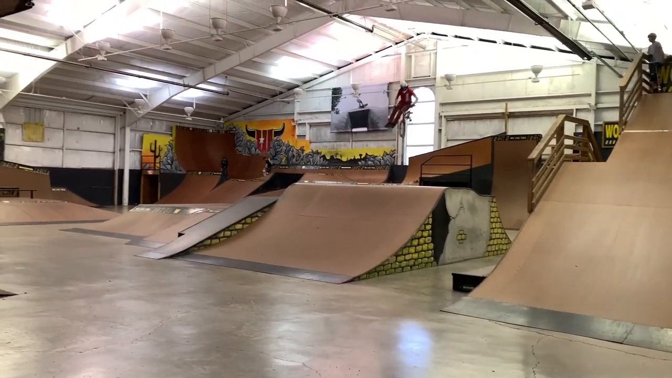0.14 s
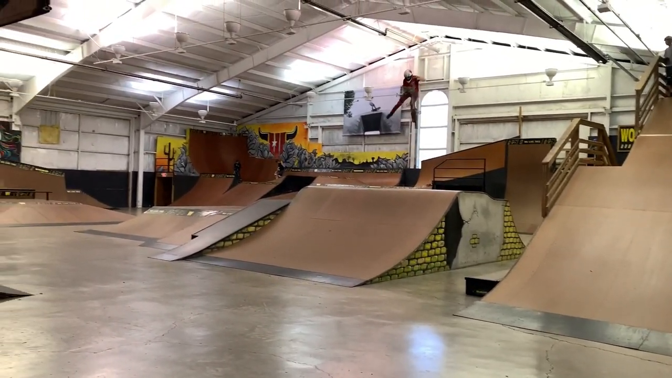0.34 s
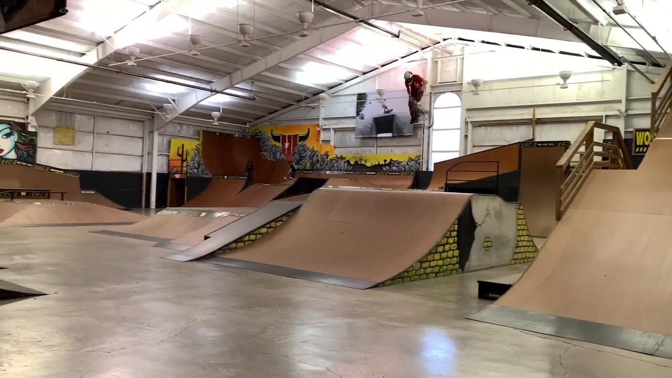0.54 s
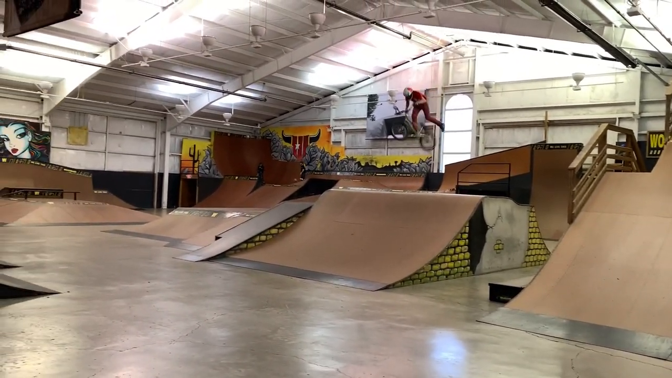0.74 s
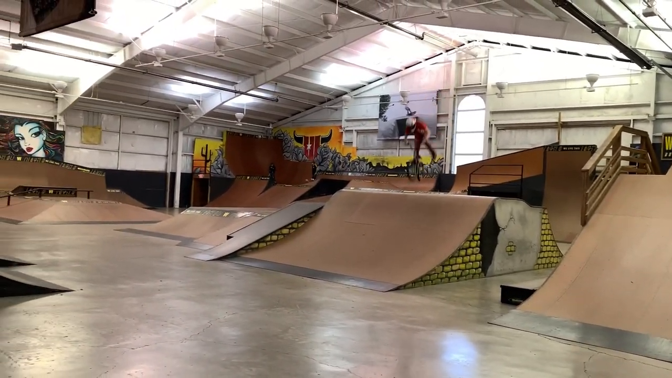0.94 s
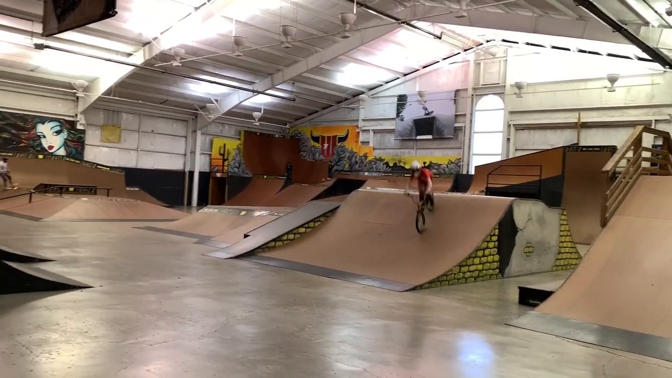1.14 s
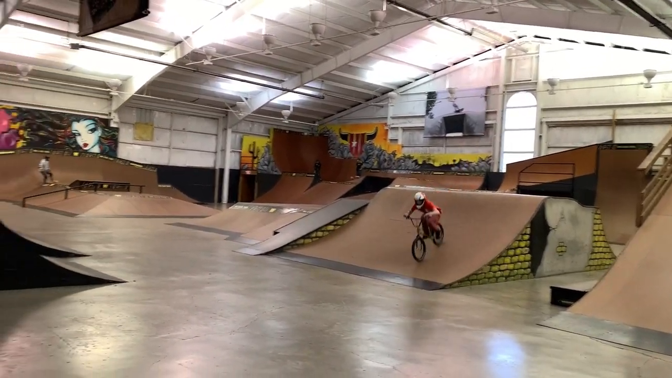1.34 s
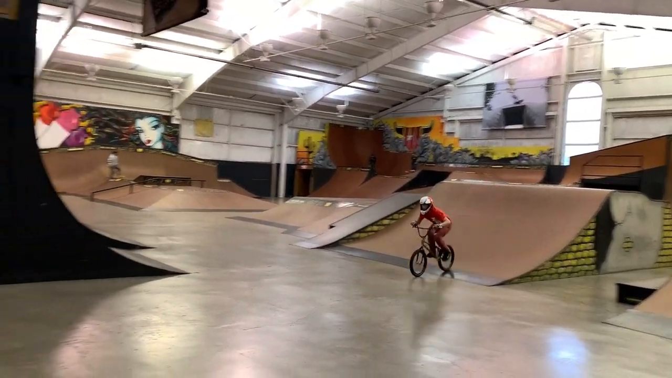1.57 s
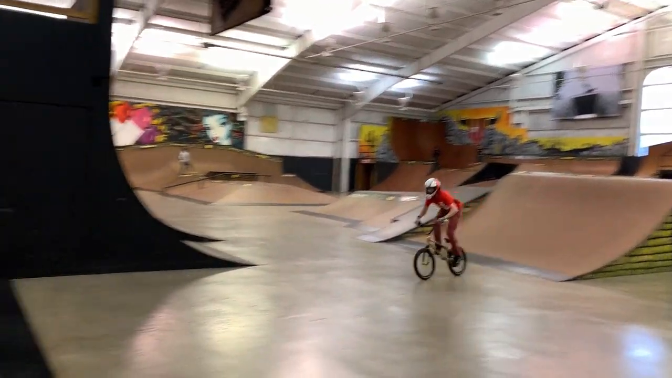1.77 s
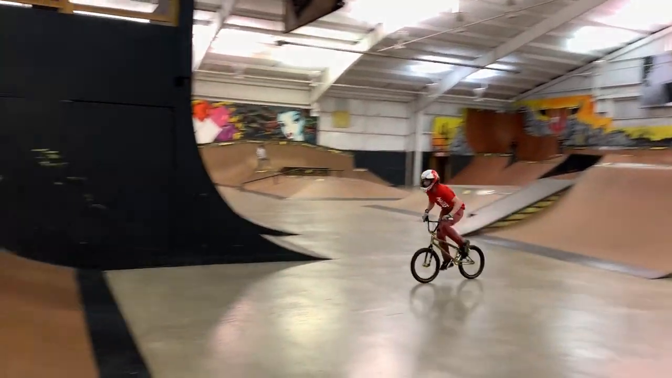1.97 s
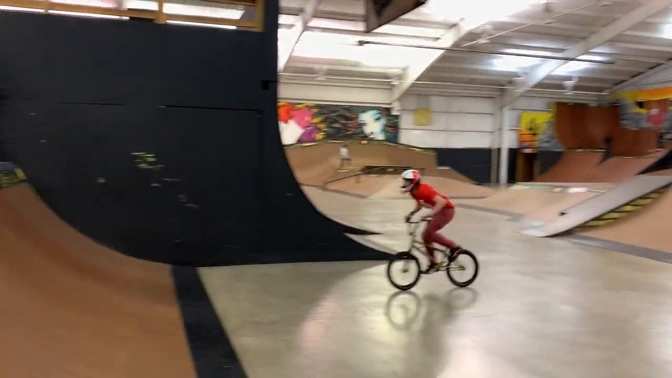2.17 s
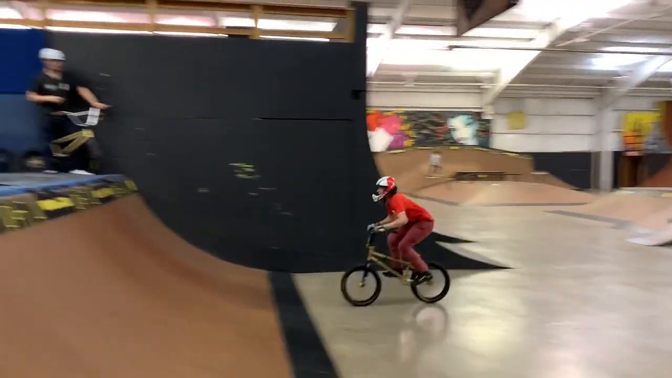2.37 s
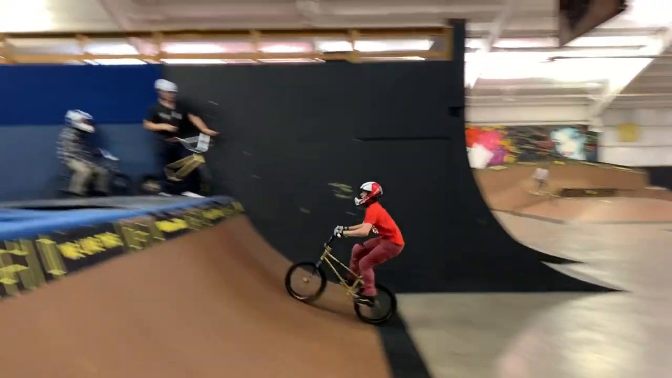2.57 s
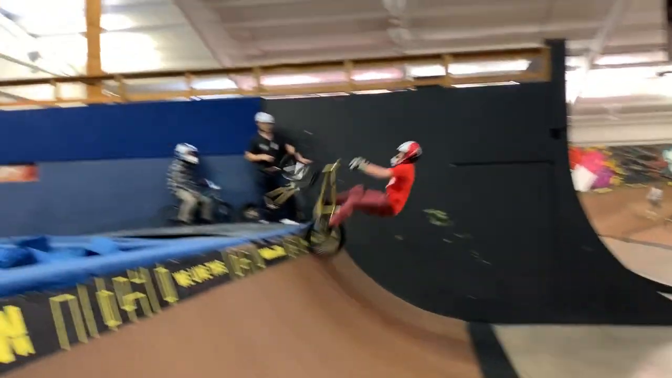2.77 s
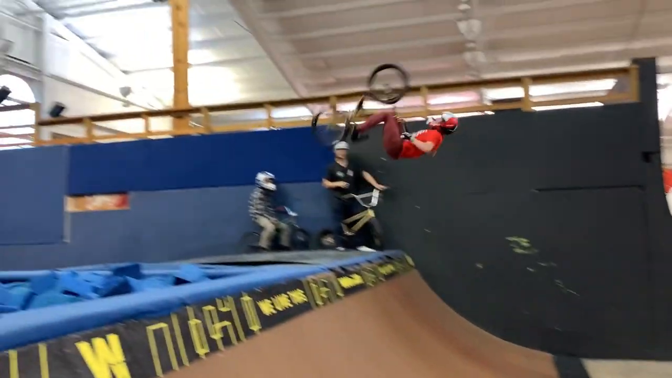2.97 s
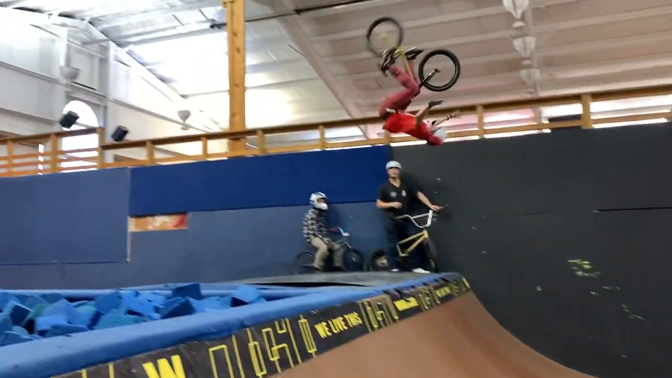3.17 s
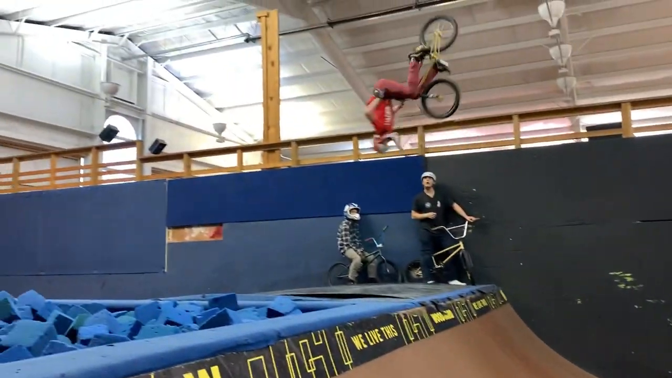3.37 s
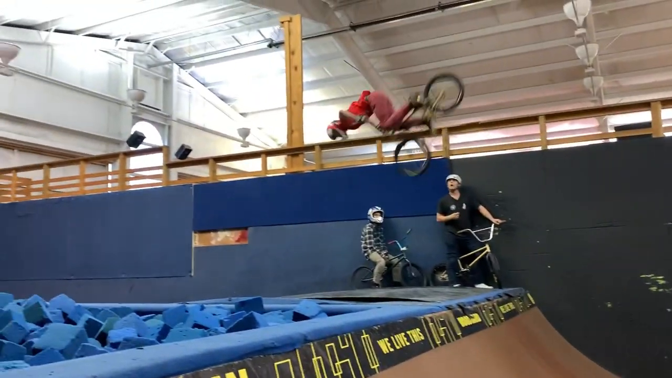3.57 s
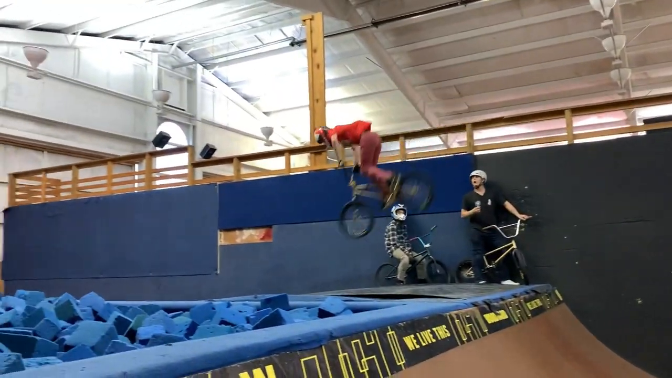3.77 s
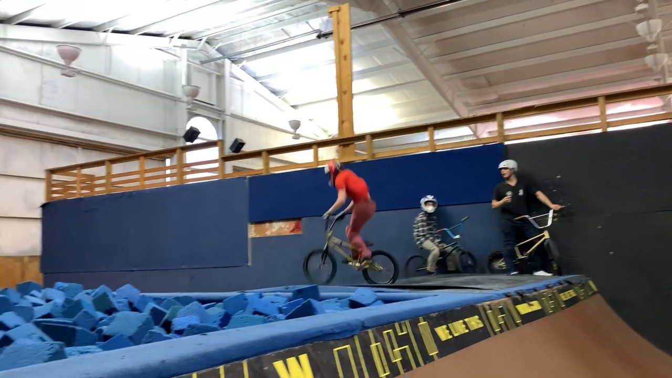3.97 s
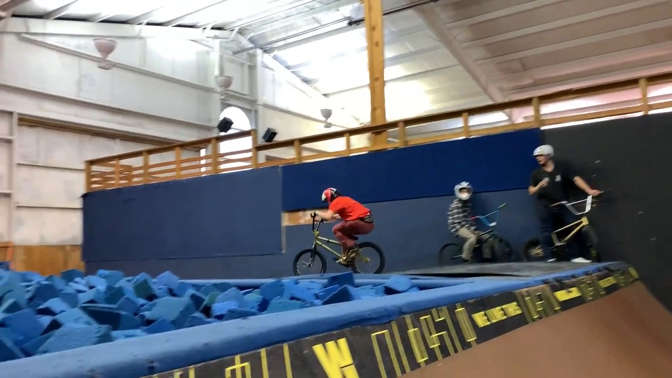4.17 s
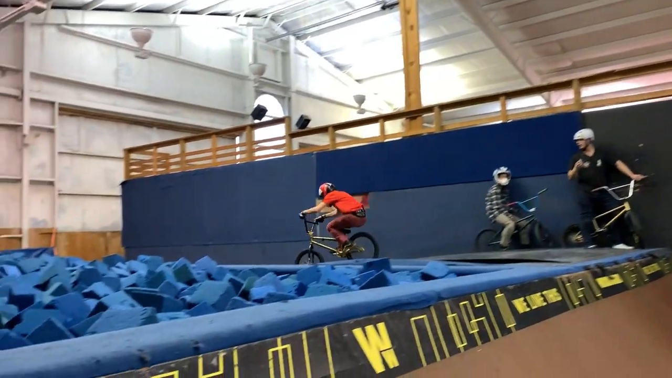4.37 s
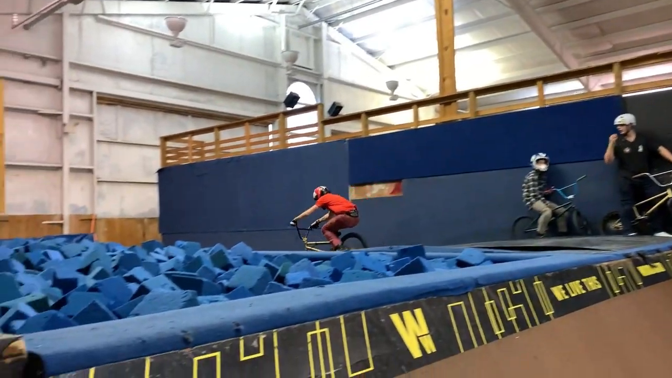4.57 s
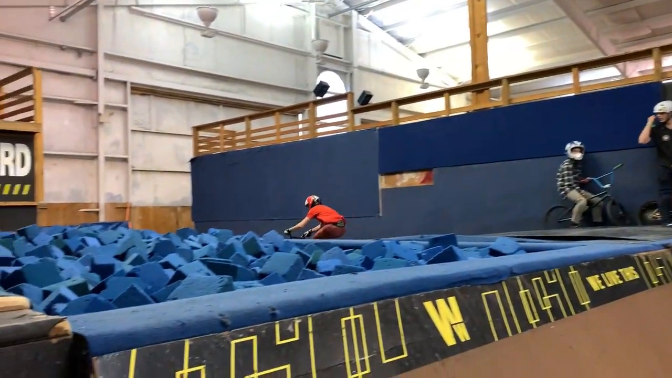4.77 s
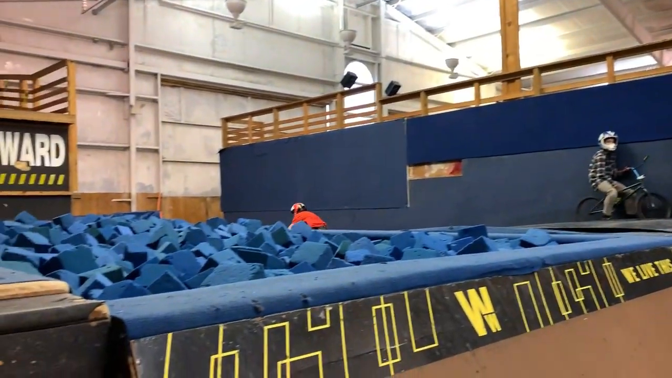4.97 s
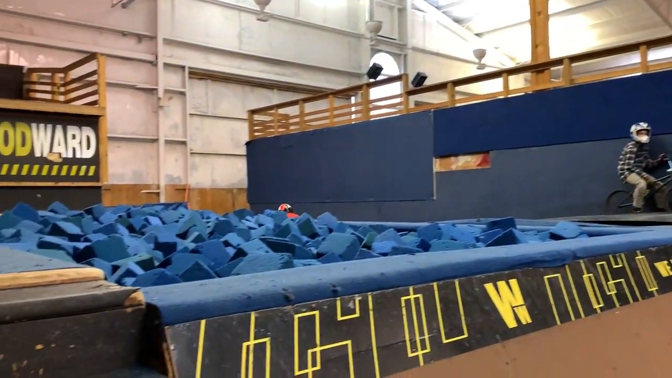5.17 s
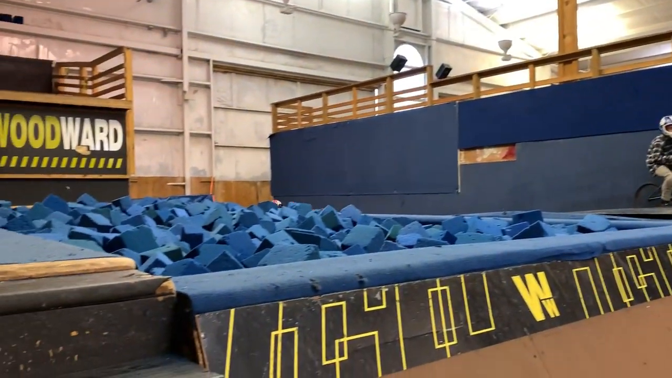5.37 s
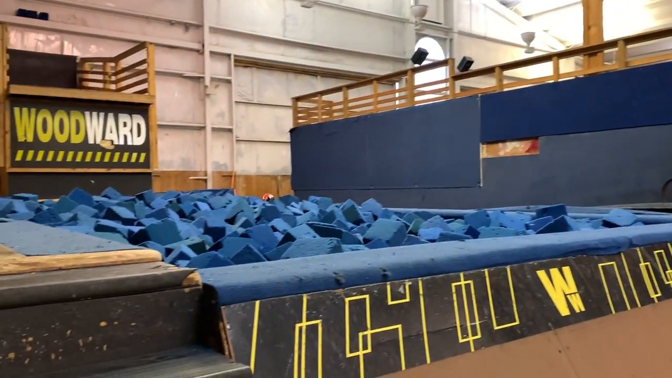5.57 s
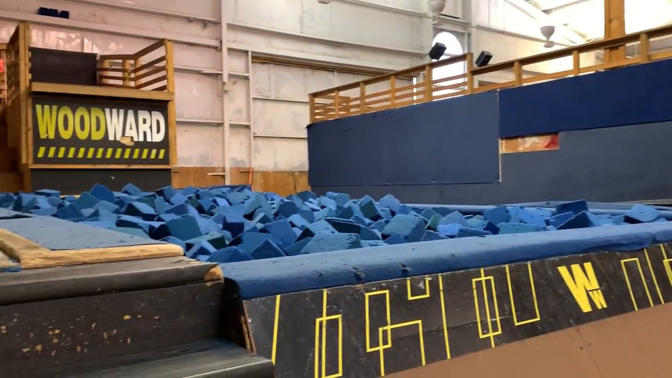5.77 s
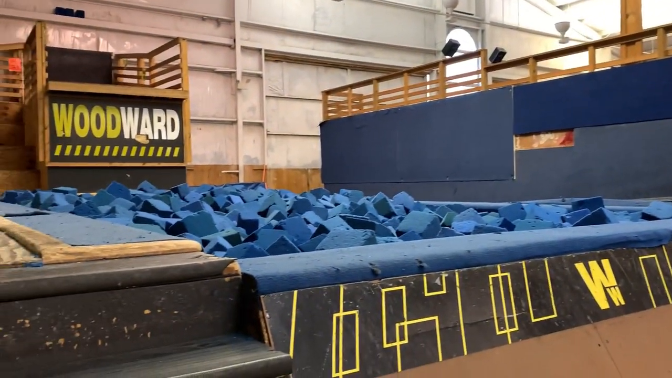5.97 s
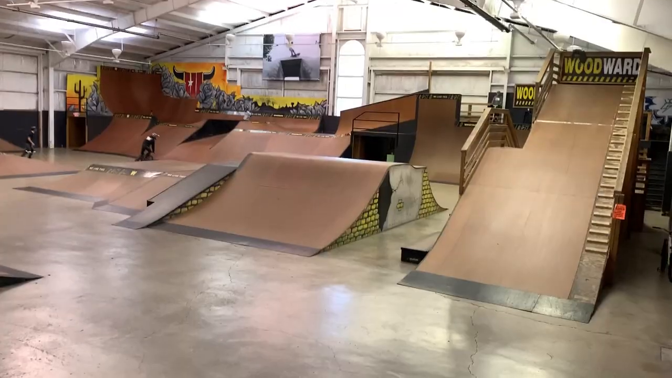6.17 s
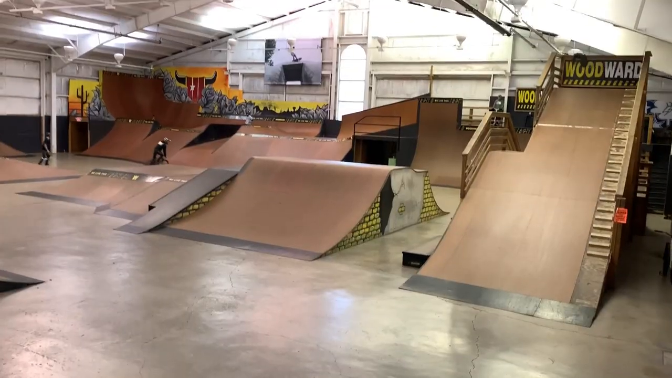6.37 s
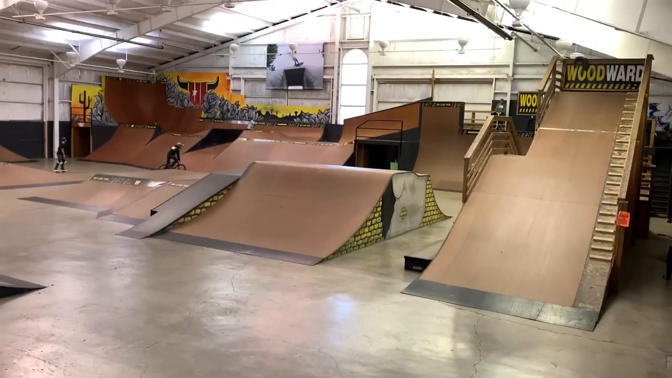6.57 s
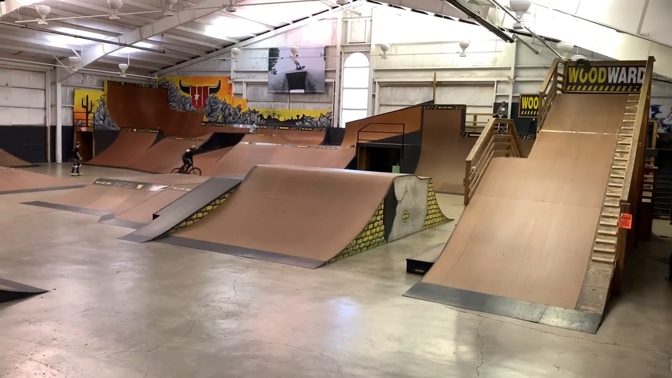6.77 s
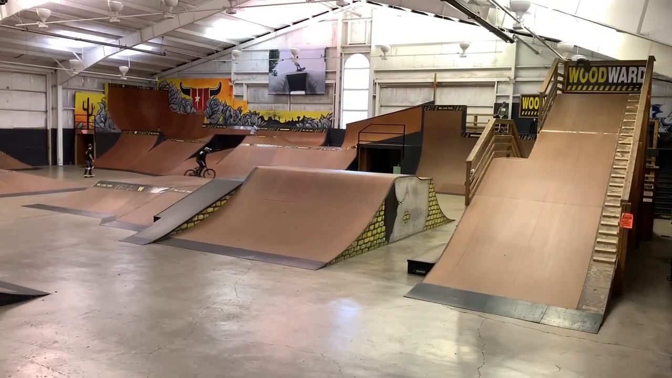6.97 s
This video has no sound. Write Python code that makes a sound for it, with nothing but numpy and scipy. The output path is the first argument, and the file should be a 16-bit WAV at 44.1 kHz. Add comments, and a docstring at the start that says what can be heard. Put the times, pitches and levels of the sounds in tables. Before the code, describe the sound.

Short rubber squeaks, sharp wheel cracks and hollow booming plywood thuds from a stunt bike echo through a large indoor skatepark over ventilation rumble and lamp buzz.

```python
"""BMX bikes in a large indoor skatepark, over the steady rumble of ventilation and the buzz of lamps.
First rubber squeaks by stick-slip; from 0.44 s wheel strikes across the hall crack as filtered noise.
From 1.15 s, 2.5 s and 4.0 s more strikes boom as modes of hollow plywood, with a long hall echo; tyres
roll as banded noise and whine in narrow bands; more squeaks come at 3.4 s and from 4.1 s.
At 6.15 s the listening point jumps to a far rider, whose tyres whirr in noise with dulled treble."""
import sys
import numpy as np
from scipy import signal
from scipy.fft import rfft, irfft, next_fast_len
from scipy.io import wavfile

SR = 44100
rng = np.random.default_rng(int(sys.argv[2]) if len(sys.argv) > 2 else 0)


def waveform_to_disk(signal):
    """Save audio, clipped to [-1, 1], as 16-bit WAV at the path in sys.argv[1]."""
    frames = np.transpose(np.atleast_2d(signal))
    scaled = np.clip(frames, -1, 1) * 32767
    samples = np.round(scaled).astype(np.int16)
    wavfile.write(sys.argv[1], SR, samples)


def boost_factor(decibels):
    """Convert a level in decibels to a linear amplitude factor."""
    exponent = np.asarray(decibels, float) / 20
    return 10 ** exponent


N = 309702

# Wheel strikes: t/s, direct crack peak level/dB, relative thud level/dB, thud tilt/(dB per octave),
# f/Hz near which the frame rings most
STRIKES = [(0.4413, -15, -38, 4, 5030), (0.4483, -18, -29, 12, 5000), (0.47, -40, -24.5, 9, 4500),
           (0.5036, -14.5, -27, 6, 4680), (0.5105, -14, -40, 10, 5400), (0.523, -27, -40, 2, 3387),
           (0.529, -17, -32, 14, 4410), (0.5481, -24, -23, 6.5, 4400), (0.582, -20, -18, 5.5, 3027),
           (0.589, -13.5, -35, 11, 4800), (0.619, -24, -22, 3, 2490), (0.5365, -17, -40, 3, 5400),
           (0.629, -20.5, -16.5, 1, 3000), (0.6748, -23, -16, -0.5, 3470), (0.8633, -28, -24.5, 7.5, 4500),
           (1.1497, -18, -25, -3, 3500), (1.154, -20, -12, -4, 3500), (1.235, -17, -25, -12, 3500),
           (1.2402, -22.5, -4, -0.5, 2720), (1.254, -39, -13, -2, 3000), (1.281, -42, -13.5, -0.5, 3000),
           (1.3116, -41, -12, 0.5, 3000), (2.5252, -12.5, -16.5, 3, 3500), (2.536, -17, -17, 7, 2400),
           (2.5616, -26, -31, -9, 4400), (2.6122, -7, -12.5, 5.5, 4500), (2.626, -23.5, -13.5, 4, 2400),
           (2.64, -28, -19, 7.5, 5000), (2.657, -31, -15, -2, 3000), (2.799, -20.5, -20, -8, 4500),
           (2.881, -65, -25.5, -9, 3000), (3.865, -30, -48, 5, 4940), (3.998, -21, -10, -0.5, 2400),
           (4.019, -44, -14, 0.5, 2393), (4.0514, -13.5, -18, -8, 1690), (4.061, -40, -13.5, -6, 1700),
           (4.0842, -15, -15, 3, 2400), (4.107, -20, -15, -5.5, 3000), (4.1475, -16, -24, -7, 2380),
           (6.458, -48, -33, 7.5, 2000), (6.525, -42, -34, 11.5, 2000)]
# Modes of the hollow plywood ramp: f/Hz, relative level/dB, t60/s
RAMP_MODES = [(52.6, -7, 0.21), (74.4, -5, 0.084), (116.6, 5, 0.11), (128.4, -4, 0.17), (171.6, -2, 0.11),
              (220, -3, 0.087), (259.7, 1.5, 0.061), (285, -1, 0.048), (397.3, -2.5, 0.06),
              (550, -8, 0.043), (667, -4.5, 0.024), (784, -11, 0.059), (920, -21, 0.043)]
# Noise spectrum of a crack: f/Hz, relative level per Hz/dB
CRACK_SPECTRUM = [(410, -49), (700, 4), (2300, -14.5), (4430, -3.5), (6800, -0.5), (13000, -25),
                  (16000, -31)]
# Modes of the steel frame: f/Hz, relative level/dB, t60/s
FRAME_MODES = [(1627, 0, 0.017), (2456, -10, 0.018), (3020, -6, 0.014), (3570, -11, 0.022),
               (4410, -4, 0.019), (4750, 1, 0.023), (5090, 10, 0.014), (5500, 5, 0.029), (6930, -17, 0.013)]
# Rubber squeaks: t/s, length/s, mean f/Hz, fundamental level/dB, octave level/dB
SQUEAKS = [(0.212, 0.06, 1136, -35.5, -46), (0.248, 0.048, 1327, -27.5, -46),
           (0.298, 0.076, 1326, -28.5, -45), (0.41, 0.053, 1320, -29.5, -56),
           (3.431, 0.016, 1155, -23.5, -30), (3.443, 0.035, 1106, -25, -30.5),
           (3.471, 0.04, 1110, -30.5, -38), (3.497, 0.075, 1331, -20.5, -33.5),
           (3.564, 0.031, 1353, -27.5, -32), (4.138, 0.022, 1097, -32, -50),
           (4.158, 0.088, 1099, -31.5, -38.5), (4.206, 0.09, 1090, -32.5, -33),
           (4.264, 0.11, 1090, -35, -44), (4.5, 0.25, 1080, -49, -53)]
# Narrow-band tyre whines: t/s, length/s, f/Hz, width/Hz, greatest rms level/dB
WHINES = [(2.124, 0.23, 4500, 240, -41), (1.9, 0.098, 4500, 250, -47), (1.71, 0.22, 3300, 290, -48),
          (1.63, 0.14, 550, 54, -38), (1.97, 0.54, 770, 48, -47), (6.15, 0.36, 1900, 89, -50),
          (6.4, 0.22, 735, 240, -37)]
# Wheels on plywood: t/s, hold/s, deck rumble level/dB, tread buzz level/dB, fade/(dB per s)
RIDES = [(0.427, 0.21, -25, -30.5, 35.5), (0.731, 0.13, -32.5, -37.5, 23), (1.144, 0.21, -27, -37.5, 81),
         (1.237, 0.072, -32, -41.5, 9.5), (2.519, 0.047, -21.5, -32.5, 200), (2.607, 0.025, -20, -31, 67),
         (2.776, 0.026, -34, -43, 80), (4.001, 0.13, -22.5, -28.5, 94), (4.251, 0.14, -28.5, -37, 67),
         (4.846, 0.11, -39, -80, 17), (5.496, 0.45, -39.5, -76.5, 24), (6.34, 0.065, -37.5, -44, 40),
         (6.437, 0.11, -51, -38, 58), (6.558, 0.28, -59, -40.5, 64), (6.854, 0.024, -49, -47, 106)]
# Tyres hissing on smooth ground: t/s, rise/s, hold/s, level/dB, fade/(dB per s)
GLIDES = [(0.0, 0.0028, 0.066, -44.5, 100), (0.438, 0.0086, 0.021, -37, 300),
          (0.477, 0.021, 0.06, -39, 152), (0.862, 0.015, 0.022, -47.5, 203),
          (1.147, 0.019, 0.72, -44.5, 56), (2.125, 0.095, 0.029, -35, 8), (2.533, 0.01, 0.013, -29.5, 300),
          (2.604, 0.0045, 0.023, -32.5, 64), (2.918, 0.28, 0.29, -43, 78), (3.996, 0.016, 0.065, -34.5, 79),
          (4.177, 0.04, 0.066, -47, 22), (4.706, 0.56, 0.67, -59, 69)]
# Level curve of the far rider's tyres: t/s, level/dB
FAR_TYRES = [(6.149, -48), (6.166, -45.5), (6.394, -54.5), (6.566, -52), (6.738, -47.5), (6.828, -44),
             (7.02, -58)]
# Noise spectra of deck rumble, tread buzz, tyre hiss, far tyres and ventilation:
# f/Hz, relative level per Hz/dB
RUMBLE_SPECTRUM = [(15, -59), (32, -4), (118, 16.5), (318, -0.5), (356, -39), (534, -35), (1200, -21),
                   (1560, -58), (2640, -120)]
TREAD_SPECTRUM = [(180, -2), (300, -5), (362, -9.5), (704, -5), (1730, -12), (4730, -19.5), (6000, -21),
                  (7800, -61), (13200, -120)]
HISS_SPECTRUM = [(880, -7), (1500, -0.5), (3220, 2), (4610, 0.5), (5870, 0.5), (13000, -7), (15500, 9),
                 (16500, -40)]
WHIRR_SPECTRUM = [(900, -30), (1500, 5), (1950, 18), (2500, 7), (3300, -25), (4000, -16), (5000, -46)]
AIR_SPECTRUM = [(13, -41), (25, -15), (48, 13.5), (80, 3.5), (193, 10.5), (453, -18.5), (855, -43),
                (1500, -39), (2900, -10), (3610, -27), (3980, -31), (4720, -22), (6020, -24.5), (7500, -23),
                (9750, -70), (16500, -120)]
# Decay of the hall: f/Hz, t60/s
HALL_DECAY = [(40, 1.86), (120, 0.39), (300, 0.41), (800, 1.8), (1250, 1.59), (2400, 1.5), (5000, 1.04),
              (12000, 0.024)]
# Left-right likeness of diffuse sound: f/Hz, correlation (-1 to 1)
LIKENESS = [(30, 1), (60, 0.93), (130, 0.99), (290, 0.86), (640, 0.5), (1410, 0.053), (3100, 0.041),
            (6820, 0.058)]
# Stereo lean of diffuse sound: f/Hz, left minus right level/dB
LEAN = [(60, 0), (240, 2), (950, 2.5), (3770, 1), (15000, -1.5)]
# Two frequencies at which left and right treble stand in opposite phase: f/Hz
OPPOSITE_PHASE_HZ = (8650, 13250)
# Lamp lines: whole or half multiple of the buzz frequency; and, in the same order, base rms level/dB
LAMP_MULTIPLES = (14, 17, 18, 22, 26, 27, 28, 29, 30, 31, 32, 33, 34, 35, 36, 37, 37.5, 38, 38.5, 39, 40,
                  41, 42, 43, 44, 46, 47)
LAMP_LEVELS = [-64.8, -67.1, -68.1, -63.9, -64.3, -64.8, -67.6, -64.7, -54.2, -59.9, -65.7, -69.6, -64.5,
               -58.8, -60.2, -54.8, -71.1, -53.1, -68.2, -55.3, -51.2, -60.5, -58.9, -64.5, -69.7, -62.0,
               -67.4]
# Loud or dead spots of one lamp line passed by the microphone: middle t/s, f/Hz, length/s, swell level/dB
LOUD_SPOTS = [(0.12, 4800, 0.45, -7.9), (0.6, 3240, 1, 12.6), (0.6, 4320, 2.2, 11.5), (0.6, 5040, 2.2, 7.5),
              (0.72, 4200, 1, 8.5), (0.84, 3600, 0.45, -9.9), (2.04, 4920, 0.7, 7.8),
              (2.4, 4560, 0.3, -14.2), (2.88, 4680, 0.3, -12.4), (3.0, 4680, 2.2, 6.3),
              (3.6, 4320, 0.45, -14.1), (3.72, 3600, 1, 6.1), (3.72, 4800, 1, -9.7),
              (3.72, 5520, 0.7, -10.8), (3.84, 5280, 2.2, 8.1), (4.68, 4560, 0.3, 4.0),
              (4.68, 4680, 0.3, -8.1), (4.8, 4440, 0.3, 5.4), (4.92, 3480, 1, 6.5), (5.04, 2640, 1, 7.6),
              (5.04, 3600, 0.3, -11.5), (5.04, 5520, 0.45, 9.1), (5.28, 3360, 2.2, 8.8),
              (5.28, 4200, 0.45, 9.0), (5.28, 4560, 0.3, -8.5), (5.4, 3720, 1, 7.1), (5.4, 5160, 2.2, 10.2),
              (5.64, 4560, 2.2, 5.8), (5.76, 4920, 2.2, 12.6), (5.88, 4800, 2.2, 6.9),
              (6.0, 3120, 0.7, 9.3), (6.46, 5040, 0.3, -13.0), (6.58, 4680, 0.3, -9.7),
              (6.7, 4440, 1, -7.6), (6.7, 4680, 2.2, 7.4), (6.7, 4800, 0.45, -6.5)]
# Faint duct resonances: f/Hz, width/Hz, mean level/dB
DUCT_RESONANCES = [(853.6, 66, -53.5)]
# Edges of the half-octave bands: f/Hz
EDGES_HZ = 22 * 2 ** np.arange(0, 9.8, 0.5)

TIME_S = np.arange(N) / SR
JUMP_S = FAR_TYRES[0][0]      # the listening point jumps to the far rider
ACROSS_UNTIL_S = 1.0          # until then strikes and hiss come from across the hall
OPPOSITE = np.array([[1], [-1]])      # signs for left and right
STRIKE_SIDES = boost_factor(0.5 * OPPOSITE)    # strikes lean 1 dB to the left


def rms_one(x):
    """Normalisation: scales a signal to unit rms."""
    return x / np.sqrt(np.mean(x ** 2) + 1e-20)


def at_hz(points, hz):
    """Interpolation: reads a frequency table on a logarithmic axis."""
    table_hz, values = np.array(points).T
    return np.interp(np.log(hz), np.log(np.maximum(table_hz, 1)), values)


def band_gains(spectrum):
    """Power summation: half-octave band gains scaled to a total power of one."""
    gains = boost_factor(at_hz(spectrum, np.sqrt(EDGES_HZ[1:] * EDGES_HZ[:-1])))
    return gains / np.sqrt(np.sum(gains ** 2 * np.diff(EDGES_HZ)) / (SR / 2))


def drift(rate_hz):
    """Random modulation: noise through two equal poles at rate_hz, with rms one."""
    pole = np.exp(-2 * np.pi * rate_hz * 64 / SR)      # one value every 64 samples
    noise = rng.standard_normal(N // 64 + 2002)
    slow = signal.lfilter([1], [1, -2 * pole, pole ** 2], noise)[2000:]
    return np.interp(np.arange(N) / 64, np.arange(len(slow)), rms_one(slow))


def ring(push, hz, t60):
    """Damped resonance: a unit push sets a sine of height one ringing."""
    r, w = boost_factor(-60 / (t60 * SR)), 2 * np.pi * hz / SR
    return signal.lfilter([0, np.sin(w)], [1, -2 * r * np.cos(w), r * r], push)


def narrow(hz, width):
    """Resonant filtering: stereo noise passed twice through one resonance, with rms one."""
    r, air = np.exp(-np.pi * width / SR), rng.standard_normal((2, N))
    for _ in range(2):
        air = signal.lfilter([1, 0, -1], [1, -2 * r * np.cos(2 * np.pi * hz / SR), r * r], air)
    return rms_one(air)


def stereo_bands(size):
    """Diffuse-field coherence: bands alike in the bass, unrelated higher up, phase-turned in the treble."""
    white = rng.standard_normal((2, 2, size))
    offset_hz = np.fft.rfftfreq(size, 1 / SR) - OPPOSITE_PHASE_HZ[0]
    phase = np.pi * (1 + 2 * offset_hz / np.diff(OPPOSITE_PHASE_HZ))
    turned = irfft(rfft(white[:, :1]) * np.exp(-0.5j * phase * OPPOSITE), size)
    for k, (low, high) in enumerate(zip(EDGES_HZ, EDGES_HZ[1:])):
        hz = np.sqrt(low * high)
        band = signal.butter(2, [low, high], "band", fs=SR, output="sos")
        mid, side = signal.sosfilt(band, white[k % 2])      # neighbouring bands use separate noise
        if low > 5000:
            pair = signal.sosfilt(band, turned[k % 2]) + 0.54 * side * OPPOSITE
        else:
            alike = np.clip(at_hz(LIKENESS, hz), -1, 1)
            pair = (np.sqrt(1 + alike) * mid + np.sqrt(1 - alike) * side * OPPOSITE) / np.sqrt(2)
        yield hz, pair * boost_factor(at_hz(LEAN, hz) / 2 * OPPOSITE)


def convolve(x, response):
    """Linear superposition: convolution by spectra, cut to the scene."""
    size = next_fast_len(N + response.shape[-1])
    return irfft(rfft(x, size) * rfft(response, size), size)[..., :N]


def ramp_thuds(buzzing):
    """Modal excitation: blows and the grit under the wheels set the modes of the hollow deck ringing."""
    start_s, _, thud_db, tilt_db, _ = np.transpose(STRIKES)
    at, out = (start_s * SR).astype(int), np.zeros((2, N))
    scatter_db = rng.normal(0, 2.0, (len(at), len(RAMP_MODES)))      # new mode strengths at each blow
    grit = rng.random(N) < 500 / SR      # grit and seams, 500 per second on average
    bumps = grit * buzzing * boost_factor(-12.5 + 2 * rng.exponential(1, N))
    for k, (hz, level_db, t60) in enumerate(RAMP_MODES):
        # the tiny constant keeps the filter clear of denormal numbers
        rough = 1e-18 + bumps * rng.standard_normal(N) * boost_factor(level_db) * (hz > 350)
        push = np.tile(rough, (2, 1))
        force_db = thud_db + tilt_db * np.log2(hz / 200)
        delay = int(min(0.6 / hz, 0.005) * SR)      # low modes answer later
        push[:, at + delay] += STRIKE_SIDES * boost_factor(force_db + level_db - 9.0 + scatter_db[:, k])
        out += ring(push, hz, t60)
    soft = np.exp(-2 * np.pi * 1500 / SR)      # a tyre is a soft hammer: one pole at 1500 Hz
    return signal.lfilter([1 - soft], [1, -soft], out)


def wheel_cracks():
    """Impact excitation: a noise burst of tyre and frame, with chain rattle, rings the steel frame."""
    t = np.arange(int(0.08 * SR)) / SR
    hz = np.fft.rfftfreq(len(t), 1 / SR)
    across_dull_db = 37 * np.maximum(np.log2((hz + 1) / 7000), 0)      # 37 dB per octave above 7 kHz
    out = np.zeros((2, N))
    for start_s, crack_db, _, _, favoured_hz in STRIKES:
        across = start_s < ACROSS_UNTIL_S
        hits = rng.random(len(t)) < 900 / SR
        rattle = hits * boost_factor(2.9 * np.minimum(rng.exponential(1, len(t)), 3.0))
        loose = rattle * rng.standard_normal(len(t)) * np.exp(-t / 0.026)      # chain and frame
        burst = rng.standard_normal(len(t)) * np.exp(-t / (0.0035 if across else 0.003)) + 0.63 * loose
        burst = burst * (1 - np.exp(-t / 0.00087) * across)      # distance smears the onset
        ringing = 0
        for mode_hz, level_db, t60 in FRAME_MODES:
            # modes lose 24.5 dB per octave away from the favoured frequency
            mode_db = level_db - 24.5 * abs(np.log2(mode_hz / favoured_hz)) + rng.normal(0, 3.0)
            ringing = ringing + rms_one(ring(burst, mode_hz, t60)) * boost_factor(mode_db)
        shape = boost_factor(at_hz(CRACK_SPECTRUM, hz + 1) - across_dull_db * across)
        crack = rms_one(irfft(rfft(burst) * shape, len(t))) + 0.97 * rms_one(ringing)
        start = int(start_s * SR)
        out[:, start:start + len(t)] += STRIKE_SIDES * boost_factor(crack_db) * crack / np.max(np.abs(crack))
    return out


def squeaks():
    """Stick-slip: rubber grips and lets go at a slightly unsteady rate, a near sine with two overtones."""
    pitch, lower, upper = np.zeros((3, N))
    for start_s, length, hz, level_db, octave_db in SQUEAKS:
        t = np.arange(int(length * SR)) / SR
        span = slice(int(start_s * SR), int(start_s * SR) + len(t))
        swell = np.interp(t, [0, 0.59 * length, length], [0, 1, 0])      # swells, then lets go
        gate = np.sin(np.pi / 2 * swell) ** 1.56
        pitch[span] = hz - 21 * (t / length - 0.5)      # sinks by 21 Hz
        lower[span] += gate * boost_factor(level_db)
        upper[span] += gate * boost_factor(octave_db)
    phase = 2 * np.pi * np.cumsum(pitch * (1 + 0.0097 * drift(48.5))) / SR
    apart = -0.5 * OPPOSITE      # half the phase between the sides, radians
    third = 2.26 * (upper / (lower + upper + 1e-9)) ** 2      # grows with the share of the octave
    overtones = np.sin(2 * phase + apart) + third * np.sin(3 * phase + apart)
    return np.sqrt(2) * (lower * np.sin(phase + apart) + upper * overtones)


def whines():
    """Narrow-band noise: each tyre whine swells and dies as half a sine."""
    out = 0
    for start_s, length, hz, width, level_db in WHINES:
        swell = np.sin(np.pi * np.clip((TIME_S - start_s) / length, 0, 1))
        out = out + boost_factor(level_db) * swell * narrow(hz, width)
    return out


def bout(start_s, rise, hold, fade_db):
    """Exponential decay: power that rises, holds and fades by fade_db per second."""
    t = TIME_S - start_s
    return (np.clip(t / rise, 0, 1) * boost_factor(-fade_db * np.maximum(t - rise - hold, 0))) ** 2


def rolling():
    """Addition of powers: gains of deck rumble, tread buzz and tyre hiss over time."""
    rumble, tread, hiss = boost_factor([-39, -47, -67.5]) ** 2      # riders elsewhere in the hall
    for start_s, hold, rumble_db, tread_db, fade_db in RIDES:
        power = bout(start_s, 0.011, hold, fade_db)
        rumble = rumble + power * boost_factor(rumble_db) ** 2
        tread = tread + power * boost_factor(tread_db) ** 2
    near = TIME_S < JUMP_S
    for start_s, rise, hold, level_db, fade_db in GLIDES:
        hiss = hiss + near * bout(start_s, rise, hold, fade_db) * boost_factor(level_db) ** 2
    return np.sqrt(rumble), np.sqrt(tread), np.sqrt(hiss)


def wheels_and_ventilation(rumbling, buzzing, hissing):
    """Incoherent noise: rolling wheels and ventilation add in power, band by band; rolling is lumpy."""
    rumble, tread, hiss = (band_gains(s) for s in (RUMBLE_SPECTRUM, TREAD_SPECTRUM, HISS_SPECTRUM))
    whirr, air = band_gains(WHIRR_SPECTRUM), band_gains(AIR_SPECTRUM)
    away, across = TIME_S >= JUMP_S, TIME_S < ACROSS_UNTIL_S
    whirring = boost_factor(np.interp(TIME_S, *np.transpose(FAR_TYRES))) * away
    lumps_db, out = drift(0.47), 0
    for k, (hz, pair) in enumerate(stereo_bands(N)):
        dull_db = away * 12.0 * max(np.log2(hz / 1500), 0)      # distance takes the treble
        across_db = across * 14.0 * max(np.log2(hz / 9500), 0)      # and the top of the early hiss
        wheels = (rumble[k] * rumbling) ** 2
        wheels = wheels + (tread[k] * buzzing * boost_factor(-dull_db)) ** 2
        wheels = wheels + (hiss[k] * hissing * boost_factor(-across_db)) ** 2
        wheels = wheels * boost_factor(lumps_db)      # power: half this in dB
        far_wheels = (whirr[k] * whirring * boost_factor(2 * drift(10))) ** 2
        ventilation = (air[k] * boost_factor(-38 - 0.019 * dull_db)) ** 2
        out = out + pair * boost_factor(0.76 * drift(22.0)) * np.sqrt(wheels + far_wheels + ventilation)
    return out


def hall(knocks, rubber):
    """Reverberation: echoes die band by band; knocks get a strong early echo, squeaks a later, gradual one."""
    t = np.arange(int(2.0 * SR)) / SR
    tail = sum(pair * boost_factor(-60 * t / at_hz(HALL_DECAY, hz)) for hz, pair in stereo_bands(len(t)))
    early = 4.4 * np.exp(-t / 0.019) * (t > 0.003)
    full = tail * (1 - np.exp(-t / 0.0014) + early)
    late = tail * (1 - np.exp(-(t / 0.031) ** 2))
    out = 0
    for source, echo in ((knocks, full), (rubber, late)):
        out = out + convolve(source, echo / np.sqrt(np.sum(echo ** 2) / 2))
    return out


def lamps():
    """Standing waves: lamp buzz lines at whole and a few half multiples of 120 Hz swell and fade."""
    buzz_hz, out = 120.01, 0
    away = TIME_S >= JUMP_S
    general_db = 0.88 - 1.5 * away
    for multiple, level_db in zip(LAMP_MULTIPLES, LAMP_LEVELS):
        for middle_s, hz, length, swell_db in LOUD_SPOTS:
            if round(hz / buzz_hz) == multiple:
                same_place = away == (middle_s >= JUMP_S)
                swell = np.exp(-(2 * (TIME_S - middle_s) / length) ** 2)
                level_db = level_db + swell_db * swell * same_place
        # wandering phase between the sides
        half_phase = np.pi / 4 + 0.5 * drift(0.23) + 0.25 * drift(2.4)
        apart = half_phase * rng.choice([-1, 1]) * OPPOSITE
        waver_db = 2 * np.array([drift(0.5), drift(0.57)])
        flicker_db = 2.5 * np.array([drift(2.8), drift(2.9)])
        gain = boost_factor(level_db + general_db + waver_db + flicker_db)
        start_phase = rng.uniform(0, 2 * np.pi, 2)[away.astype(int)]      # a new phase after the jump
        phase = 2 * np.pi * buzz_hz * multiple * TIME_S + start_phase + apart
        out = out + np.sqrt(2) * gain * np.sin(phase)
    return out


def ducts():
    """Resonance: air sings faintly in narrow bands, waxing and waning."""
    out = 0
    for hz, width, level_db in DUCT_RESONANCES:
        out = out + boost_factor(level_db + 1.0 * drift(0.65)) * narrow(hz, width)
    return out


def scene():
    """Superposition: direct sound, reaching the left side a little late, then echo and background."""
    rumbling, buzzing, hissing = rolling()
    thuds, cracks, rubber = ramp_thuds(buzzing), wheel_cracks(), squeaks()
    direct = thuds + cracks + rubber * boost_factor(1.1 * OPPOSITE)      # squeaks lean left
    direct[0] = np.roll(direct[0], shift=3)      # samples
    knocks = boost_factor(-5.0) * thuds.mean(axis=0) + boost_factor(-6.0) * cracks.mean(axis=0)
    echo = hall(knocks, boost_factor(-12.0) * rubber.mean(axis=0))
    wheels_and_air = wheels_and_ventilation(rumbling, buzzing, hissing)
    return direct + echo + whines() + wheels_and_air + lamps() + ducts()


def low_pass(x):
    """Removes everything above the highest recorded frequency."""
    return signal.sosfilt(signal.butter(12, 16960, fs=SR, output="sos"), x)


def record(dry):
    """Band limitation: the microphone loses the deepest bass and the top is cut."""
    thinned = signal.sosfilt(signal.butter(4, 39, "high", fs=SR, output="sos"), dry)
    finished = signal.sosfilt(signal.cheby2(12, 60, 16300, fs=SR, output="sos"), thinned)
    return low_pass(finished)


dry = scene()
out = record(dry)
waveform_to_disk(out)
```